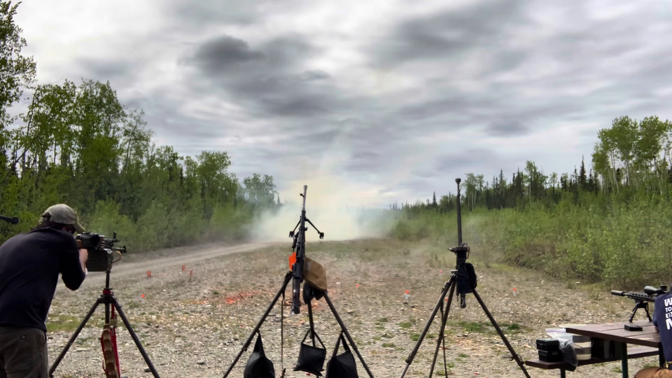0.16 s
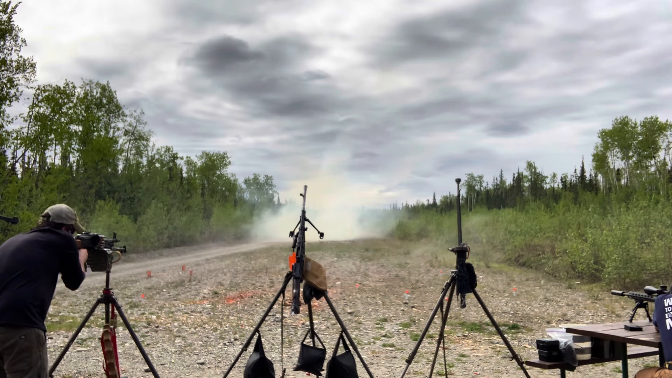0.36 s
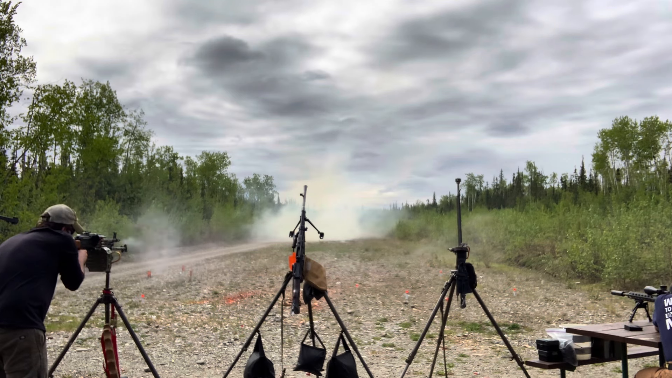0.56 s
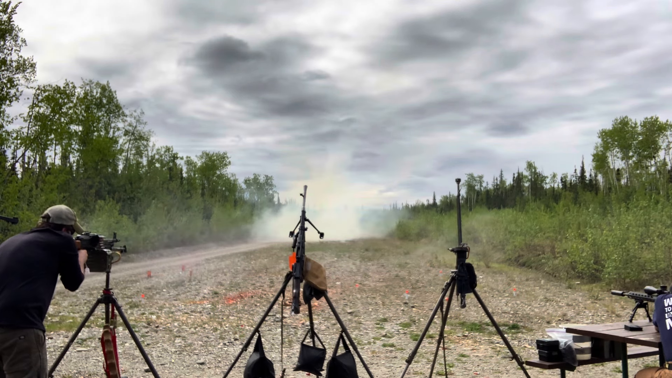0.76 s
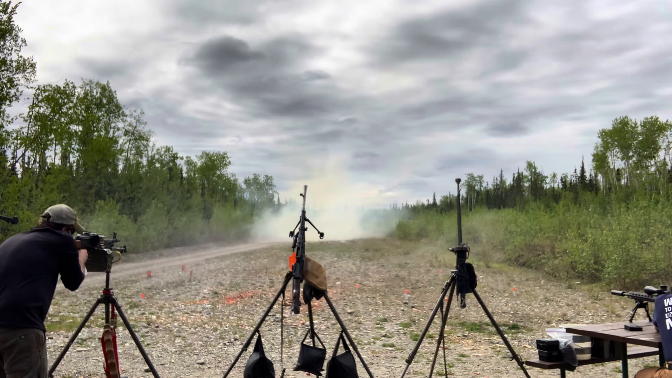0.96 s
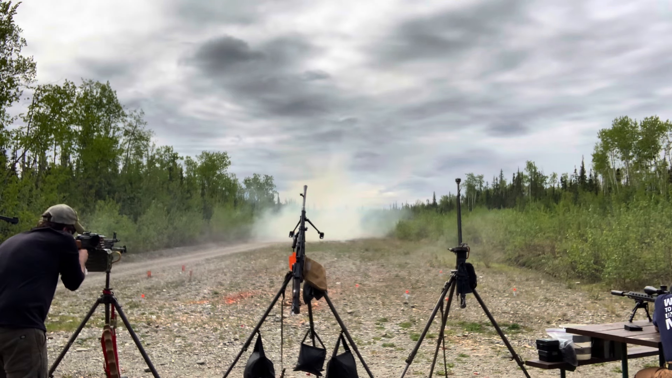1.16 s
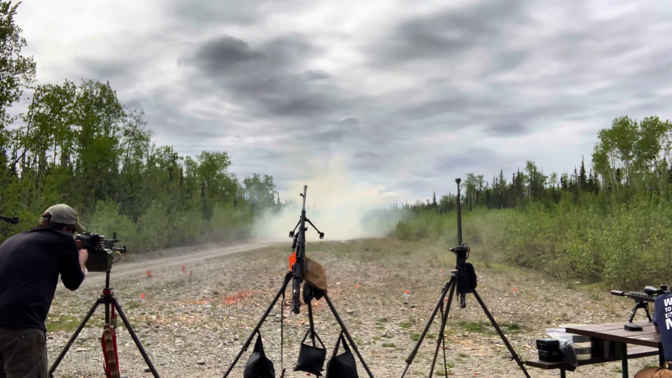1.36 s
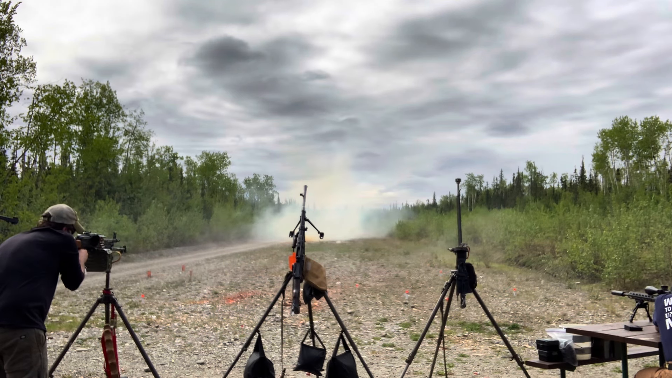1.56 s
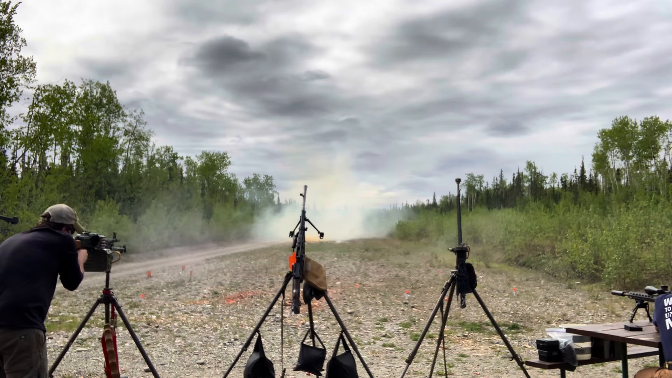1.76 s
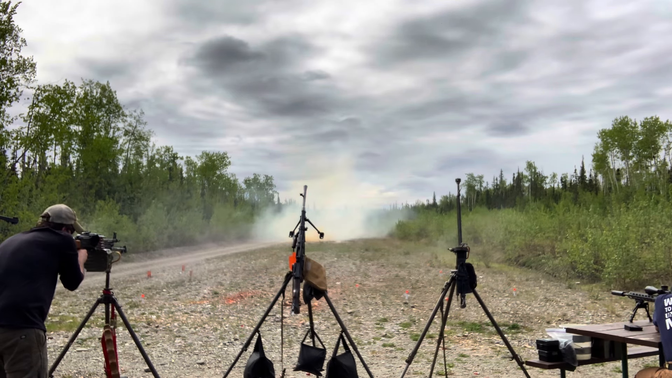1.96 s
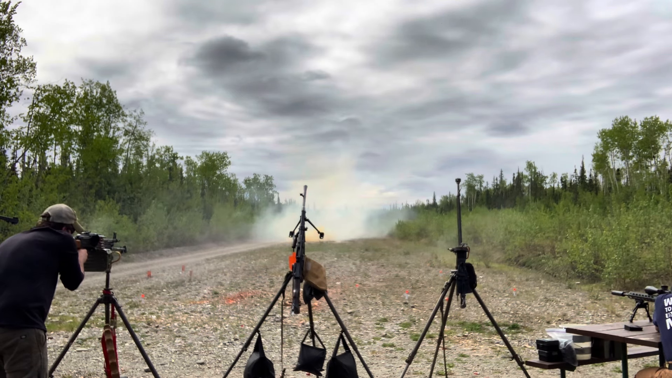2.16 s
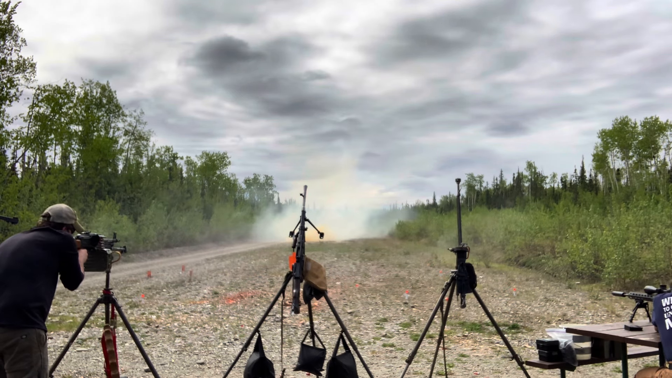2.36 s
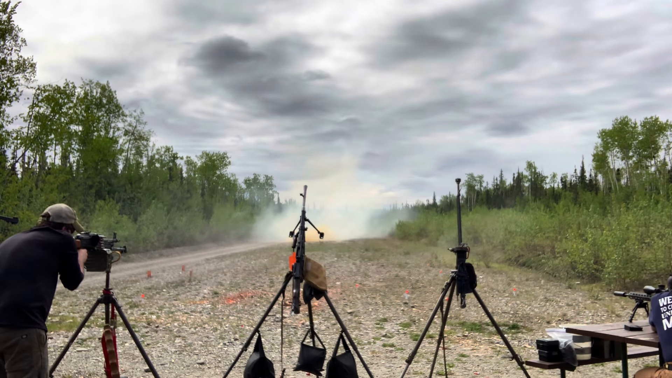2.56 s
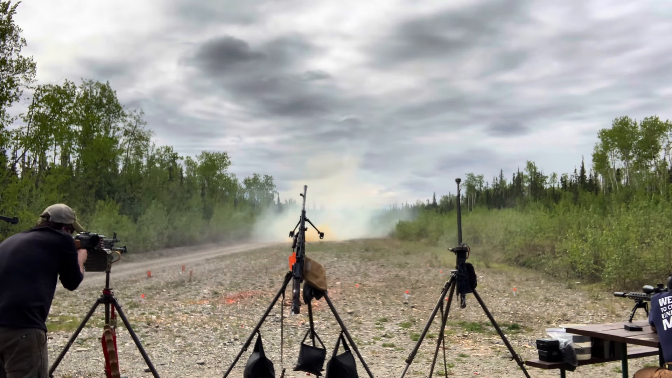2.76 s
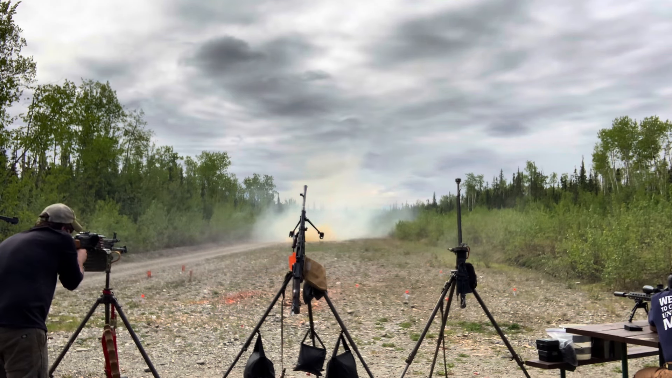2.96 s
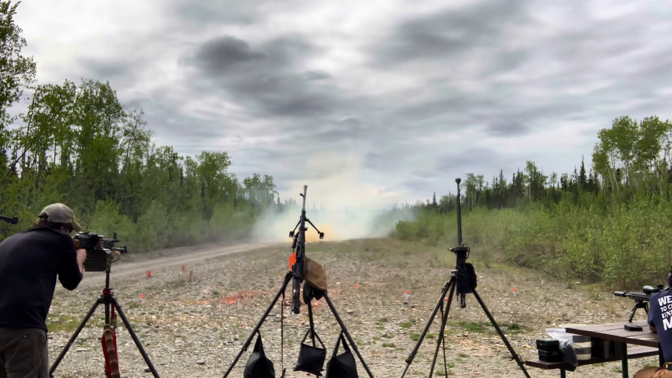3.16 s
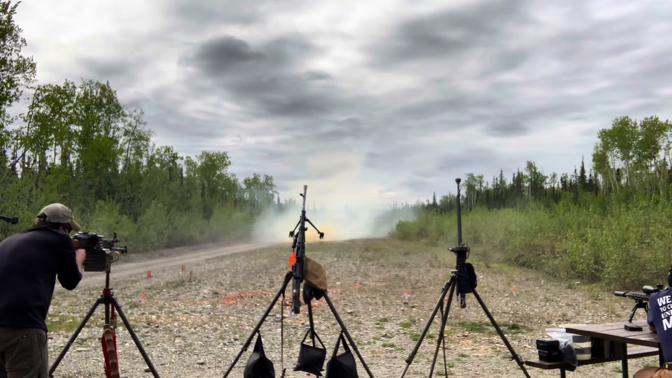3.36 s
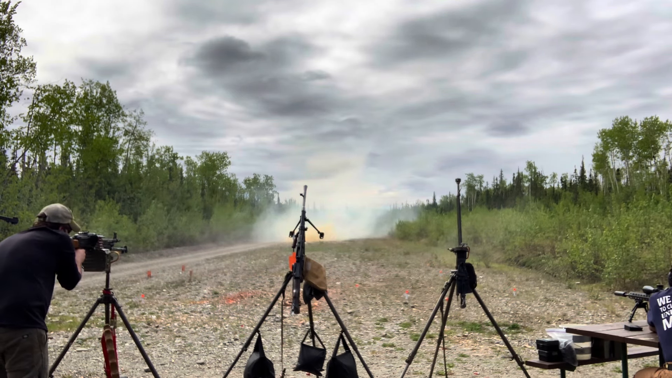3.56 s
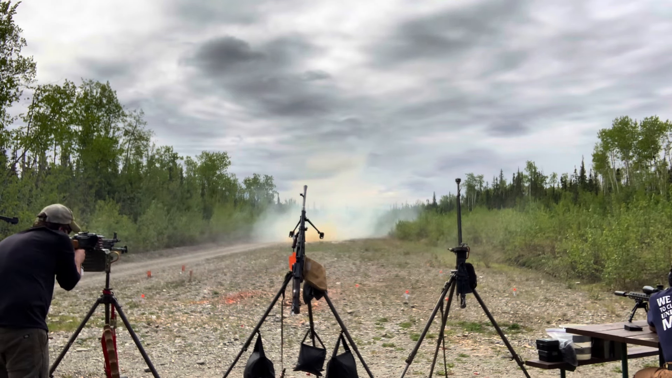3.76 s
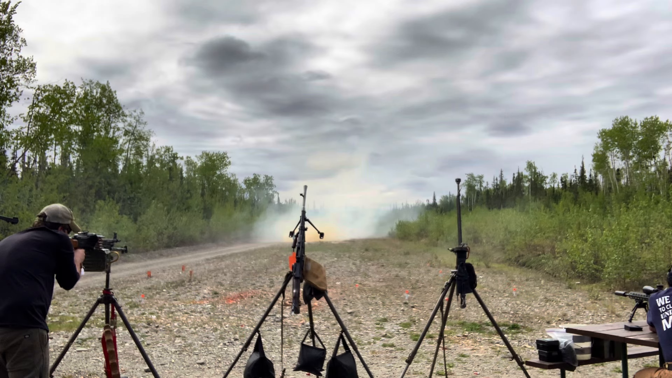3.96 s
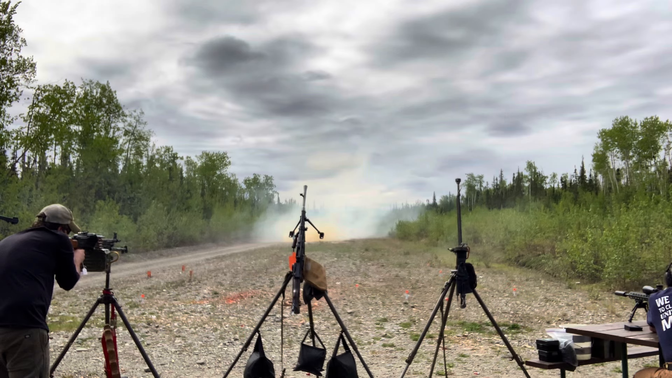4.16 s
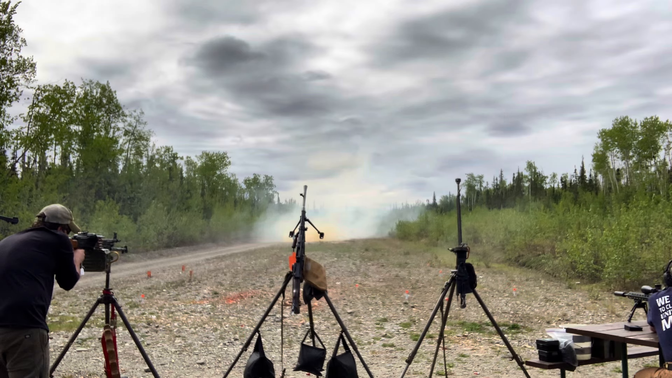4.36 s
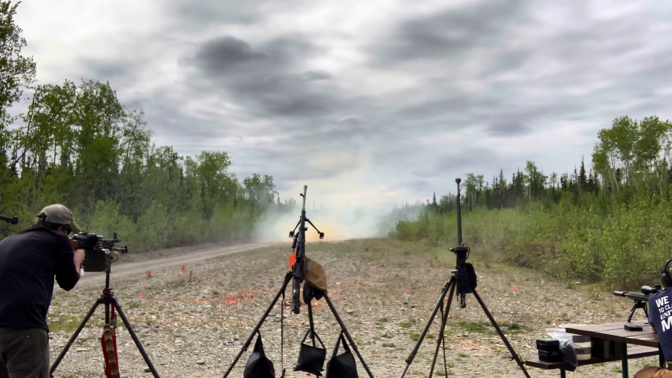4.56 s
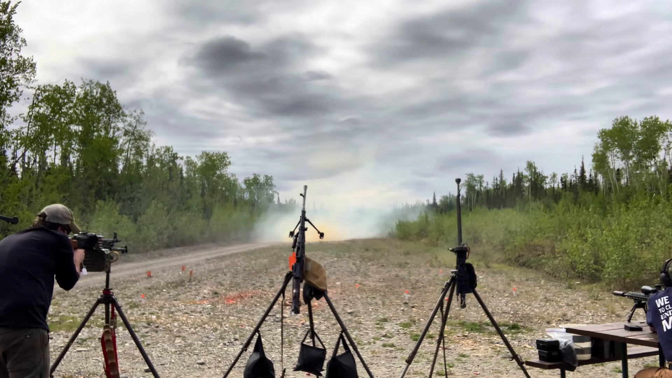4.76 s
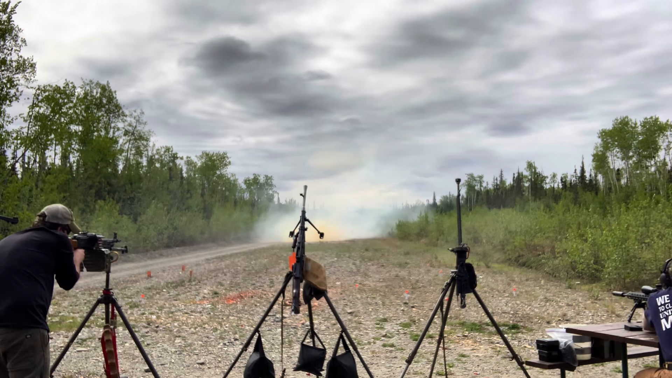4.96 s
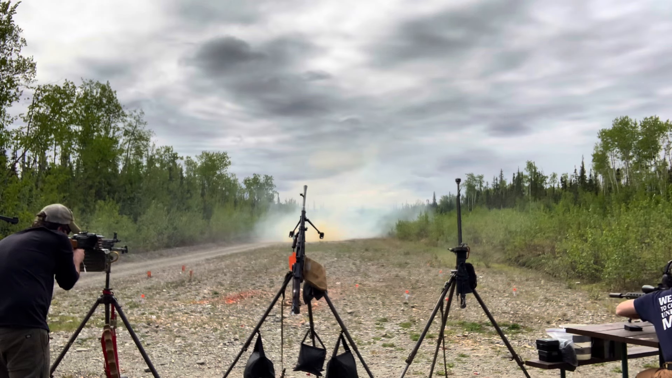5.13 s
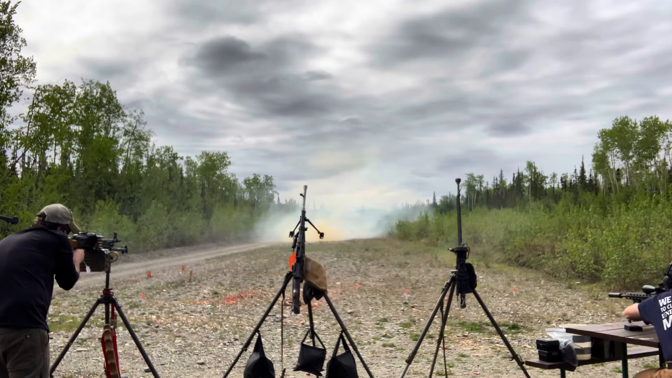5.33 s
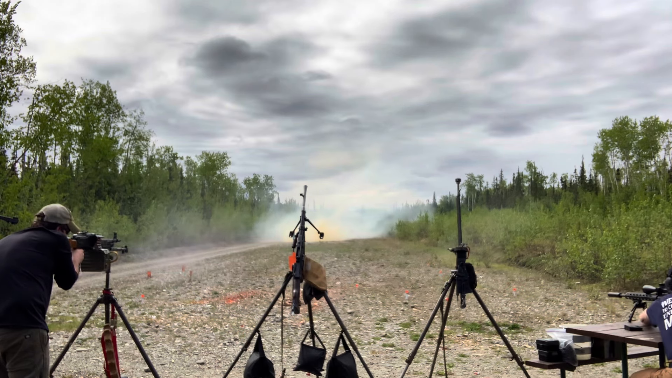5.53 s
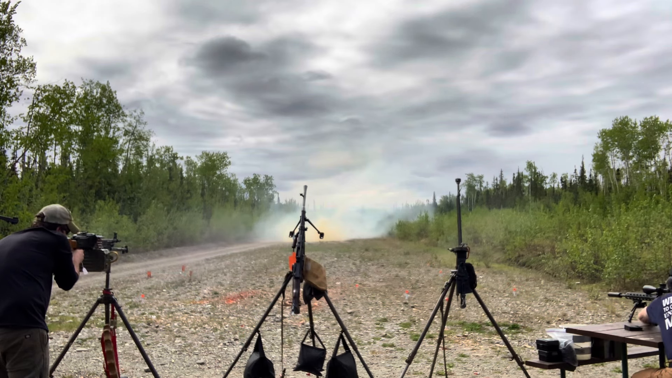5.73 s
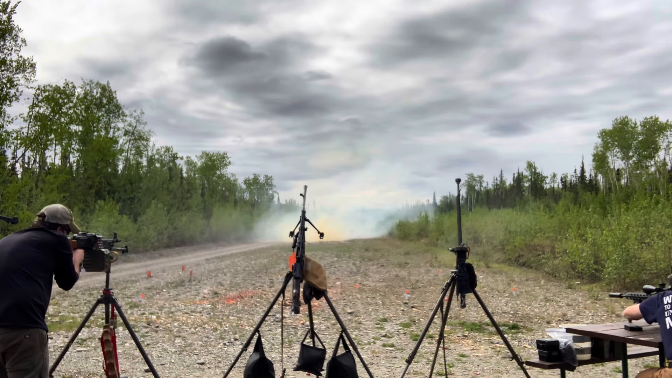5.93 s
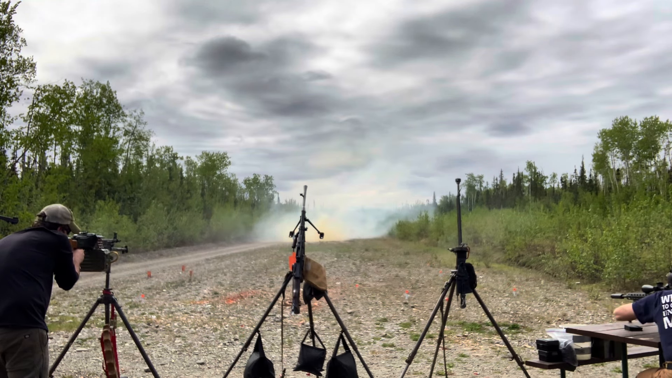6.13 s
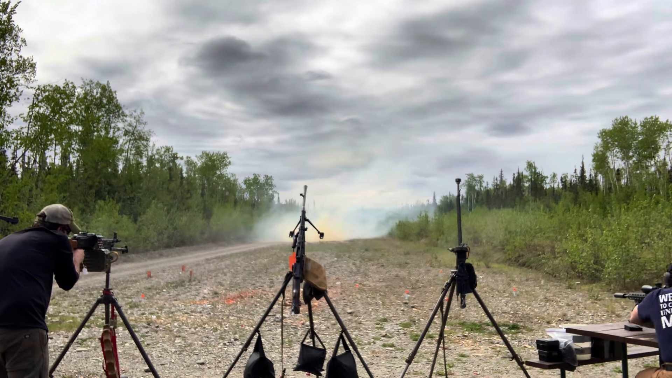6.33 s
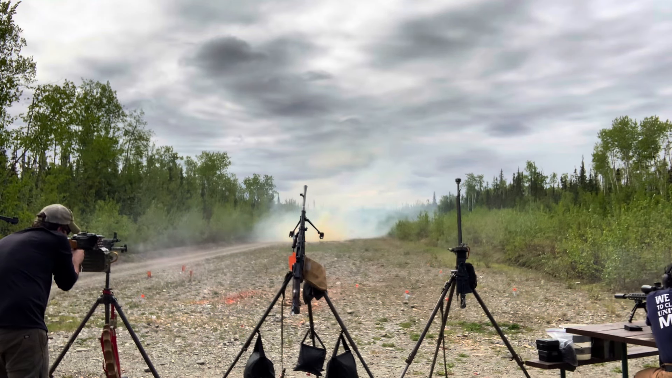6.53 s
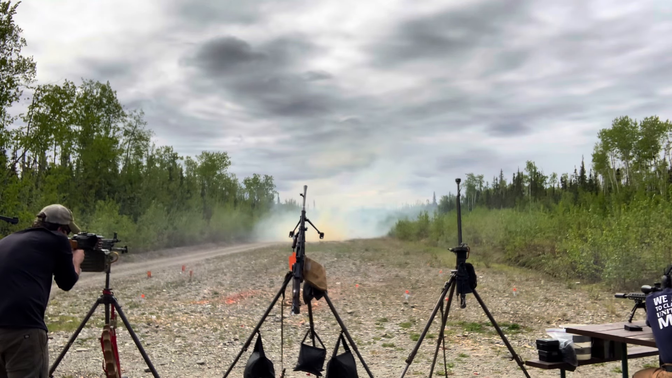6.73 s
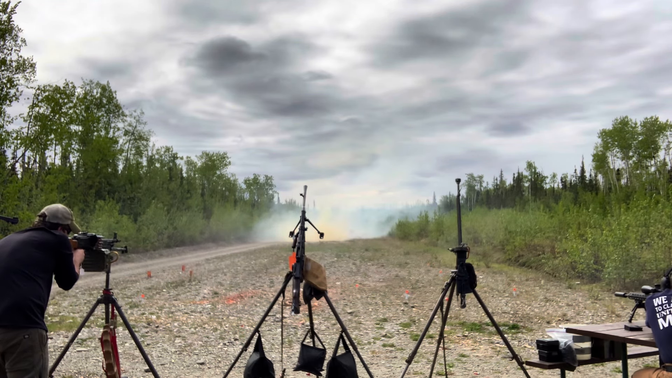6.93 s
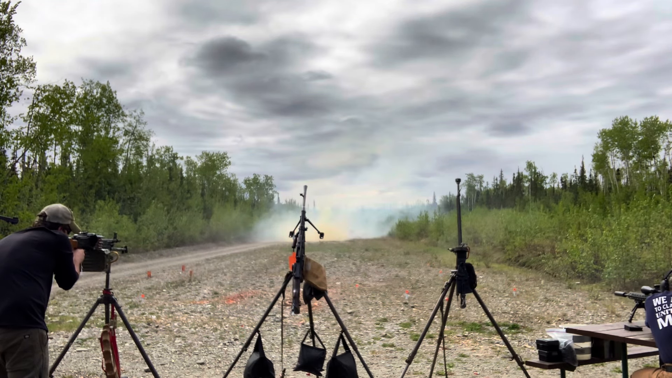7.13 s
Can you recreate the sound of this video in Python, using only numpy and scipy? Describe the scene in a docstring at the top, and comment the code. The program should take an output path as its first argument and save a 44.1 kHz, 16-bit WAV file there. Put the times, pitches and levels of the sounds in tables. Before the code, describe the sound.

The fading echo of an earlier shot opens, then sharp three-round rattles and heavier double shots. Spent cases tinkle faintly, two bassy booms roll off, and after a brief gap a fast gun fires for about a second. A slower, uneven burst thuds for two seconds. Gravel scatter and long tree echoes follow each round; the stereo microphone is close and compressed.

```python
"""Machine guns fire bursts along a gravel firing line cut into a forest, heard through a hard-driven microphone.
An earlier shot's wash is dying as a fast gun rattles close on the left and a heavy gun on the right fires a pair;
spent cases tinkle, two deep booms go off, the fast gun fires a long burst, a slow gun thuds further along,
the heavy gun fires two more pairs, and a faint rush rises downrange.
Each round is a pressure pulse, a noise crack and gravel scatter; decaying noise makes the trees' long wash."""
import sys
import numpy as np
from scipy import signal
from scipy.fft import rfft, irfft
from scipy.io import wavfile

SR = 44100
rng = np.random.default_rng(int(sys.argv[2]) if len(sys.argv) > 2 else 0)


def wrap_up_sound(samples):
    """Save the sound to the file named by the first command line argument, as 16-bit audio."""
    columns = np.atleast_2d(samples).T
    # keep every value between -1 and 1, then stretch to whole-number steps
    tamed = np.clip(columns, -1, 1)
    steps = np.round(tamed * 32767).astype(np.int16)
    wavfile.write(sys.argv[1], SR, steps)


N = 317070
SHOT_T = np.arange(SR // 4) / SR   # time after a shot [s]
WASH_T = np.arange(2 * SR) / SR    # time along a wash [s]

# colour of the scatter off the gravel: freq_hz [Hz], relative level_db [dB]
GRAVEL = [(50, -34.5), (180, -6), (380, 1.5), (1100, -2.5), (2000, -8), (4000, -11.5), (7000, -21.5),
          (14000, -39.5)]
# colour of the wash from the trees: freq_hz [Hz], relative level_db [dB]
FOREST = [(40, -26.5), (250, -6), (550, 3), (800, 2), (1100, -0.5), (2000, -3.5), (3600, -2), (6500, -8),
          (9000, -18.5), (16000, -12.5)]


def from_db(db):
    """Turn decibels into an amplitude factor."""
    return 10 ** (np.asarray(db) / 20)


def at_hz(points, hz):
    """Read a two-column table on a log-frequency axis."""
    f, value = np.transpose(points)
    return np.interp(np.log(np.maximum(hz, 1)), np.log(f), value)


def bins(x):
    """Frequencies of the spectrum of x."""
    return np.arange(x.shape[-1] // 2 + 1) * SR / x.shape[-1]


def coloured(x, spectrum):
    """Filter by a table of frequency in Hz and level in dB."""
    gain = from_db(at_hz(spectrum, bins(x)))
    return irfft(rfft(x) * gain, x.shape[-1])


def noise(t, spectrum):
    """Diffuse stereo noise of rms 1, strongly alike at both ports only in the bass."""
    # likeness of scattered sound at the two ports: freq_hz [Hz], correlation [-1 to 1]
    likeness = [(60, 0.79), (200, 1), (500, 0.15), (1000, 0.2), (3000, 0.029), (16000, 0.093)]
    mid, side = rfft(rng.standard_normal((2, len(t))))
    alike = np.clip(at_hz(likeness, bins(t)), -1, 1)
    ports = np.sqrt(1 + alike) * mid + np.sqrt(1 - alike) * side * [[1], [-1]]
    x = coloured(irfft(ports, len(t)), spectrum)
    return x / x.std()


def late(x, s):
    """Delay a sound by s seconds."""
    i = np.arange(len(x))
    return np.interp(i - s * SR, i, x, left=0)


def from_side(x, lead_ms):
    """Sound from one side reaches the left port earlier by lead_ms (negative: the right port)."""
    half_lead = np.pi * bins(x) * lead_ms / 1000
    return irfft(rfft(x) * np.exp(1j * half_lead * np.array([[1], [-1]])), len(x))


def add(out, s, x):
    """Mix x into out from time s on, cropped at both ends."""
    i = round(s * SR)
    x = x[:, max(-i, 0):N - i]
    out[:, max(i, 0):max(i, 0) + x.shape[1]] += x


def uneven(x, depth_db, count):
    """Interfering paths leave random peaks and dips in the spectrum."""
    return coloured(x, np.c_[np.geomspace(250, 16000, count), depth_db * rng.standard_normal(count)])


def grainy(x, share):
    """Single trunks stand out: break a wash into short, uneven returns that average the same power gain."""
    grain_db, grain_s = 4.5, .005   # spread at a share of 1, spacing
    steps = np.arange(0, WASH_T[-1], grain_s)
    gain = from_db(share * grain_db * rng.standard_normal(len(steps)))
    gain = np.interp(WASH_T, steps, gain)
    return x * gain / np.sqrt(np.mean(gain ** 2))


def forest(spectrum, swell_s, swell_db):
    """The trees answer a shot with clumps of echoes and a swell or dip; air takes the treble first."""
    # decay before the tree-line lift: freq_hz [Hz], t60_s [s]
    decay = [(60, 2.04), (300, 1.34), (1000, 1.995), (2500, 1.82), (4500, 0.81), (7000, 0.87), (14000, 0.3)]
    # lift of the returns from the tree line: after_shot_s [s], level_db [dB]
    tree_line = [(0, -4), (.12, -2), (.36, 3.5), (.72, 6), (1.6, 10.5)]
    clump_db = 4.2
    t = WASH_T
    returns, out = rfft(noise(t, spectrum)), 0
    centres = np.geomspace(50, 16000, 12)   # overlapping bands, Hz
    swell = np.exp(-((t - swell_s) / 0.11) ** 2)
    for hz, share in zip(centres, np.eye(len(centres))):
        band = irfft(returns * at_hz(np.c_[centres, share], bins(t)), len(t))
        clumps = np.interp(t, np.linspace(0, 2, 140), rng.standard_normal(140))
        # trunks throw back the low mids, leaves blur the treble
        trunks = at_hz([(100, 0.71), (550, 0.97), (3000, 0.3)], hz)
        fade_db = -60 * t / at_hz(decay, hz)
        echo_db = trunks * (clump_db * clumps + swell_db * swell)
        out = out + grainy(band, trunks) * from_db(fade_db + echo_db)
    return out * from_db(np.interp(t, *np.transpose(tree_line)))


def earlier_shot():
    """The wash of a shot from before the start, still dying away."""
    # start_s [s], level_db [dB]
    start_s, level_db = (-.17, -24.5)
    out = np.zeros((2, N))
    add(out, start_s, from_db(level_db) * forest(FOREST, swell_s=0.18, swell_db=14.0))
    return out


def far_rush():
    """A soft, grainy midrange rush of noise rises from far down the range at the end."""
    # rise of the rush: time_s [s], level_db [dB]
    rise = [(6.6, -81), (6.95, -50.5), (7.15, -41)]
    # its colour: freq_hz [Hz], relative level_db [dB]
    colour = [(300, -29), (1200, 10), (1700, 5), (3500, -42.5)]
    out, start_s = np.zeros((2, N)), rise[0][0]
    level = from_db(np.interp(start_s + WASH_T, *np.transpose(rise)))
    add(out, start_s, level * grainy(noise(WASH_T, colour), share=.5))
    return out


def slaps(echoes):
    """Dull, distinct echoes off the nearest trunks."""
    echo = np.pad(blast(hz=547, damping=0.1, edge_hz=920), (0, len(WASH_T) - len(SHOT_T)))
    return sum(from_db(db) * late(echo, s) for s, db in echoes)


def cases(level_db):
    """Spent cases of thin brass ring briefly on the stones, differently on each landing."""
    # landings: start_s [s], relative level_db [dB]
    landings = [(0.8121, -52.5), (1.1744, -57.5)]
    # ringing modes, pitch and level varied per landing: pitch_hz [Hz], level_db [dB], t60_s [s]
    modes = [(13500, -7.5, 0.071), (14900, 3, .12)]
    out, t = np.zeros((2, N)), SHOT_T
    for s, landing_db in landings:
        ring = 0
        for hz, db, t60 in modes:
            fade = from_db(db + rng.normal(0, 3) - 60 * t / t60)
            ring = ring + fade * np.sin(2 * np.pi * hz * rng.normal(1, .01) * t)
        add(out, s, from_db(level_db + landing_db) * ring[None])
    return out


def blast(hz, damping, edge_hz, order=2):
    """A jump in pressure, then suction; a bigger gas ball swings more slowly."""
    turn = 2 * np.pi * hz * SHOT_T
    pulse = np.exp(-damping * turn) * (np.cos(turn) - damping * np.sin(turn))
    soften = signal.butter(order, min(edge_hz, SR / 3), fs=SR, output="sos")
    return signal.sosfilt(soften, pulse)


def puff(level_db, fade_s):
    """Each blast shoves a fresh gust across the ports, mostly pressing on one as it draws on the other."""
    # air rushing past the ports: freq_hz [Hz], relative level_db [dB]
    air = [(25, -13.5), (60, -1), (130, -1.5), (250, -11), (2000, -73.5)]
    t = SHOT_T
    shape = (1 - np.exp(-t / 0.00063)) * np.exp(-t / fade_s)
    return from_db(level_db) * noise(t, air) * shape * [[1], [-1]]


def booms(boom_db, boom_hz, damping, front_db, rumble_db, scatter_db, scatter_s):
    """A sharp snap, a hard front and a deep pulse, which comes back ringing twice and rolls away."""
    # booms: start_s [s], relative boom level_db [dB], snap_db [dB]
    shots = [(1.7164, -8.5, -10), (1.9772, -2.5, 2)]
    # ground and tree line throw each boom back: after_boom_s [s], pitch_hz [Hz], damping [ratio],
    # level_db against the boom [dB]
    echoes = [(0.015, 290.6, 0.047, -14.5), (0.041, 140, 0.089, -13)]
    rumble_colour = [(30, -18), (60, -1.5), (140, -6.5), (300, -4.5), (950, -7.5), (2500, -14.5),
                     (8000, -27.5), (16000, -64)]   # Hz, dB
    out, t = np.zeros((2, N)), SHOT_T
    front = blast(hz=274, damping=0.29, edge_hz=830)
    pulse = blast(boom_hz, damping, edge_hz=160) + from_db(front_db) * front
    pulse = from_side(from_db(boom_db) * pulse, lead_ms=0.029)
    rumble = forest(rumble_colour, swell_s=0.016, swell_db=19.5)
    scatter_shape = (1 - np.exp(-t / 0.015)) * np.exp(-t / scatter_s)
    scatter = from_db(scatter_db) * noise(t, GRAVEL) * scatter_shape
    snap = from_side(blast(hz=2600, damping=0.25, edge_hz=4900), lead_ms=0.022)
    for s, level_db, snap_db in shots:
        add(out, s, from_db(level_db) * (pulse + scatter + puff(level_db=-11, fade_s=0.033)))
        for delay_s, hz, ring_damping, echo_db in echoes:
            echo = blast(hz, ring_damping, edge_hz=2 * hz)[None]
            add(out, s + delay_s, from_db(level_db + boom_db + echo_db) * echo)
        add(out, s, from_db(level_db + rumble_db) * rumble)
        add(out, s + 0.0027, from_db(snap_db) * snap)
    return out


def gun(shots, colour, crack_db, crack_s, thump_db, thump_hz, edge_hz, damping, thump_lag_s,
        scatter_db, scatter_s, wash, lead_ms, diffuse, echo_s, echo_db, puff_db, order=2, pan_db=0):
    """Every round: a turbulent crack, a pressure pulse with one hard echo, gravel scatter and forest wash."""
    same_blast = .22   # share of the crack's power that repeats from round to round
    out, t = np.zeros((2, N)), SHOT_T
    pulse = blast(thump_hz, damping, edge_hz, order)
    thump = from_side(pulse + from_db(echo_db) * late(pulse, echo_s), lead_ms)
    rise = 1 - np.exp(-(t / .0013) ** 2)
    crack_shape = rise / (1 + (t / crack_s) ** 2)
    scatter_shape = (1 - np.exp(-t / 0.0031)) * np.exp(-t / scatter_s)
    ground = noise(t, GRAVEL)   # the same stones answer every round from this gun
    diffuse = np.clip(diffuse, 0, 1)
    pan = from_db([[pan_db / 2], [-pan_db / 2]])

    def turbulence():
        """Muzzle gas, heard partly straight on and partly off the ground."""
        direct = from_side(noise(t, colour)[0], lead_ms)
        return np.sqrt(1 - diffuse) * direct + np.sqrt(diffuse) * noise(t, colour)

    signature = turbulence()
    for s, level_db, low_db, body_db, bark_db in shots:
        gas = np.sqrt(same_blast) * signature + np.sqrt(1 - same_blast) * turbulence()
        crack = from_db(crack_db) * uneven(gas, depth_db=2.8, count=44) * crack_shape
        stones = (ground + noise(t, GRAVEL)) / np.sqrt(2)
        scatter = from_db(scatter_db) * stones * scatter_shape
        # body lies around 400 Hz, bark around 1 kHz
        tone = [(150, 0), (420, body_db), (1000, bark_db), (1400, bark_db), (3500, 0.031)]
        report = coloured(crack + scatter, tone) * pan
        add(out, s, from_db(level_db) * report)
        add(out, s + thump_lag_s, from_db(low_db + thump_db) * (thump + puff(puff_db, fade_s=0.022)))
        add(out, s, from_db(level_db) * wash)
    return out


def heavy_gun():
    """On the right: pairs and one stray round, with much of the crack scattered off the ground."""
    # rounds: start_s [s], relative level_db [dB], thump_db [dB], bark_db (body too) [dB]
    rounds = [(0.4983, -8, 0.5, 6), (0.5736, -8, -2, 5.5), (1.6468, -9, 0.5, 8), (1.672, -10.5, -8.5, -8),
              (1.724, -10.5, -15, 6), (5.407, -7.5, -3, 4.5), (5.484, -8.5, -6.5, 5),
              (6.43, -6.5, -1.5, 6.5), (6.5103, -11, -2.5, 8)]
    # crack colour: freq_hz [Hz], relative level_db [dB]
    colour = [(88, -24), (150, -9), (1050, -2.5), (2060, -14), (2360, -7.5), (2980, -27.5), (3490, -12),
              (6260, -18), (16000, -20)]
    # trunk echoes: after_shot_s [s], relative level_db [dB]
    trunk_echoes = [(.229, -10.5), (.284, -12)]
    shots = [(s, db, thump_db, bark_db, bark_db) for s, db, thump_db, bark_db in rounds]
    far_bank = forest(FOREST, swell_s=.28, swell_db=9)
    return gun(shots, colour, crack_db=-0.5, crack_s=0.0093,
               thump_db=0.5, thump_hz=113.8, edge_hz=440, damping=0.94, thump_lag_s=.0062,
               scatter_db=-4.5, scatter_s=0.042, wash=from_db(-18.5) * far_bank + slaps(trunk_echoes),
               lead_ms=-0.405, diffuse=0.87, pan_db=0.5, echo_s=0.01094, echo_db=-11, puff_db=-17.0)


def slow_gun():
    """Further along on the left: one long thudding burst from an action that cycles unevenly."""
    # rounds: start_s [s], relative level_db [dB]
    rounds = [(4.1691, -9), (4.299, -8.5), (4.4396, -8.5), (4.558, -9), (4.6761, -8.5), (4.799, -9),
              (4.9162, -8), (5.038, -9), (5.163, -8.5), (5.2897, -9), (5.4172, -13), (5.543, -13),
              (5.664, -11.5), (5.7856, -8), (5.9134, -9.5), (6.046, -8.5)]
    # crack colour: freq_hz [Hz], relative level_db [dB]
    colour = [(350, -52), (600, 0.5), (2650, 1.5), (3530, 6), (4520, -2), (6460, -10), (13900, -18),
              (16000, -7)]
    # trunk echoes: after_shot_s [s], relative level_db [dB]
    trunk_echoes = [(.2035, -9), (.261, -11.5)]
    low_db, body_db, bark_db = -14, 0, 5.5
    shots = [(s, db, low_db, body_db, bark_db) for s, db in rounds]
    trees = forest(FOREST, swell_s=0.12, swell_db=15.0)
    return gun(shots, colour, crack_db=-2, crack_s=0.0061,
               thump_db=20.5, thump_hz=233.6, edge_hz=460, damping=0.99, thump_lag_s=-.0016,
               scatter_db=-10.0, scatter_s=0.04, wash=from_db(-18.0) * trees + slaps(trunk_echoes),
               lead_ms=0.298, diffuse=0.25, echo_s=0.01524, echo_db=-22, puff_db=-36.5, order=6)


def thin_snap(fade_s):
    """A short spit of high treble noise on the weakest round of the fast gun."""
    # start_s [s], level_db [dB]
    start_s, level_db = (1.4053, -19)
    out, t = np.zeros((2, N)), SHOT_T
    spit = noise(t, [(7000, -30), (12000, -10.0)]) * np.minimum(t / .002, 1) * np.exp(-t / fade_s)
    add(out, start_s, from_db(level_db) * spit)
    return out


def fast_gun():
    """Close on the left: rattling bursts at about 18 rounds a second."""
    # rounds: start_s [s], relative level_db [dB], thump_db [dB], body_db [dB], bark_db [dB]
    rounds = [(.3649, -0.5, -20.5, -8.5, -2), (.4226, 0.5, -17.5, -13.5, -3.5), (.4803, 0.5, -25, -3.5, 1),
              (1.4053, -10, -34.5, -17, -12), (1.5013, -0.5, -22.5, -5.5, -2.5),
              (1.5575, 0.5, -33, -13, -9), (1.6136, -0.5, -19.5, 4, 1.5), (2.7746, -1, -19, 0.5, -1),
              (2.83, 0, -23, -4, 0.5), (2.8852, -0.5, -23.5, 1, -5), (2.9404, -4.5, -19.5, 0.5, 2),
              (2.9954, -0.5, -23.5, -10, -6.5), (3.0504, -2, -22.5, -2.5, -0.5),
              (3.1052, -2, -21.5, -12.5, 2), (3.16, -3, -19, -2, 0.5), (3.2146, -1.5, -21.5, -2.5, -3.5),
              (3.2692, -3, -18.5, 1, -2), (3.3236, -1.5, -26.5, -6, -0.5), (3.378, -3.5, -18, -3, -4),
              (3.4322, -1.5, -23.5, -9, -5), (3.4864, -3, -25, -7, -2), (3.5404, -2, -35.5, -12, -8),
              (3.5944, -3.5, -21.5, -3.5, -0.5), (3.6482, -2, -29.5, -14.5, -3),
              (3.702, -1.5, -31.5, -8, -6)]
    # crack colour: freq_hz [Hz], relative level_db [dB]
    colour = [(120, -24.5), (330, 2.5), (1100, 1.5), (1500, 0.5), (2300, -11), (3200, -2), (4860, -10.5),
              (8900, -14.5), (13800, -13.5), (16000, -6.5)]
    trees = forest(FOREST, swell_s=0.36, swell_db=-20.5)   # negative: the wash dips
    return gun(rounds, colour, crack_db=-0.5, crack_s=0.0049,
               thump_db=10.5, thump_hz=71.4, edge_hz=154, damping=0.5, thump_lag_s=0.0009,
               scatter_db=-17.5, scatter_s=0.048, wash=from_db(-29.0) * trees,
               lead_ms=0.214, diffuse=0.39, echo_s=0.0316, echo_db=-13.0, puff_db=-12.5)


def shaded(x):
    """The microphone's body shades guns on its left: low mids favour the near port, upper mids the far one."""
    # freq_hz [Hz], left minus right level_db [dB]
    from_left = [(400, -0.5), (800, 2), (1200, 2), (1650, -1), (3500, -2), (7000, 0.1)]
    half_db = at_hz(from_left, bins(x)) * np.array([[.5], [-.5]])
    return irfft(rfft(x) * from_db(half_db), N)


def scene():
    """The forest and the range behind, then brass and booms, then three guns with their own washes."""
    background = earlier_shot() + far_rush()
    deep = booms(boom_db=8.5, boom_hz=74.8, damping=0.55, front_db=0.5, rumble_db=-26.0,
                 scatter_db=-10, scatter_s=0.045)
    on_the_left = shaded(slow_gun() + fast_gun())
    return background + cases(level_db=-4) + deep + heavy_gun() + on_the_left + thin_snap(fade_s=0.015)


def bass_lag(x, lowest_hz, q):
    """Octave-spaced allpass stages hold the lows back, so each pulse sweeps downwards."""
    for hz in lowest_hz * 2. ** np.arange(6):
        a = signal.iirpeak(hz, q, fs=SR)[1]
        x = signal.lfilter(a[::-1], a, x)
    return x


def mount(x):
    """The microphone's mount adds narrow resonances and one narrow dip to all that is heard."""
    # pitch_hz [Hz], level_db against the rest [dB]
    rings = [(353, 3), (468, 2.5), (815, -3), (1134, 2.5)]
    ringing = 0
    for hz, db in rings:
        b, a = signal.iirpeak(hz, 23, fs=SR)
        ringing = ringing + (from_db(db) - 1) * signal.lfilter(b, a, x)
    return x + ringing


def record(dry):
    """Two ports colour the sound and lag its bass a little differently; peaks are rounded, both ends cut."""
    # colour of what both ports share: freq_hz [Hz], level_db [dB]
    mic_sum = [(60, 6.5), (150, 5.5), (215, 2), (310, -0.5), (700, -6.5), (1500, -6), (6500, 1), (7800, -4),
               (9000, -26), (10800, 1.5), (13500, 4.5), (16000, -8)]
    # colour of their difference: freq_hz [Hz], level_db [dB]
    mic_difference = [(30, -3), (200, -2), (700, -1.5), (1500, -3.5), (4500, -2), (8500, 6), (10500, 9.5),
                      (13000, -16)]
    left = bass_lag(dry[0], lowest_hz=45.3, q=0.43)
    right = bass_lag(dry[1], lowest_hz=53.77, q=0.49)
    shared = coloured((left + right) / 2, mic_sum)
    difference = coloured((left - right) / 2, mic_difference)
    heard = mount(shared + difference * [[1], [-1]])
    heard = signal.sosfilt(signal.butter(2, 42, "high", fs=SR, output="sos"), heard)
    ceiling = .85
    rounded = heard / (1 + (heard / ceiling) ** 4) ** (1 / 4)
    return signal.sosfilt(signal.ellip(10, .3, 70, 16000, fs=SR, output="sos"), rounded)


dry = scene()
out = record(dry)
wrap_up_sound(out)
```